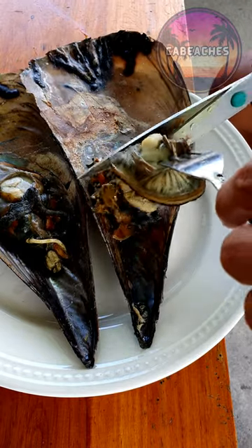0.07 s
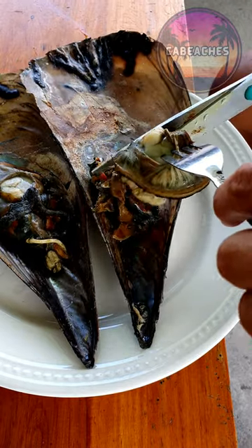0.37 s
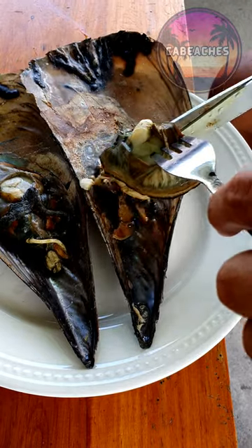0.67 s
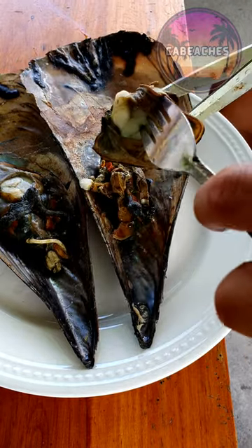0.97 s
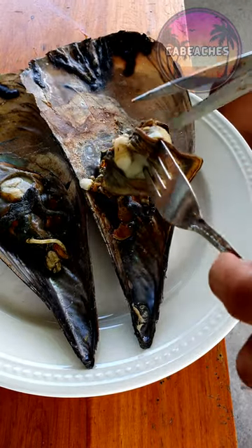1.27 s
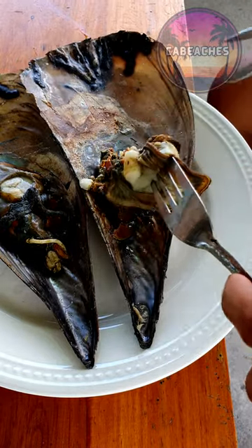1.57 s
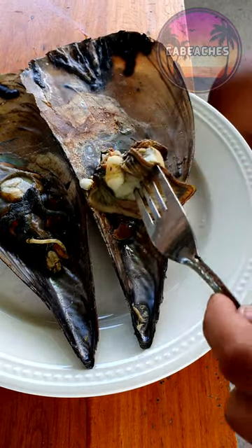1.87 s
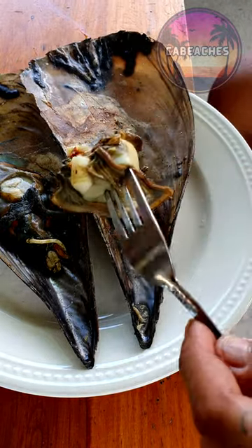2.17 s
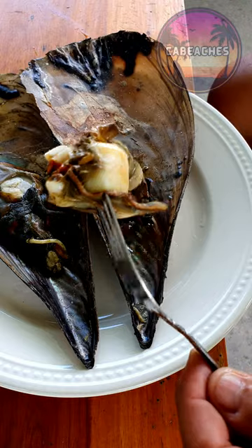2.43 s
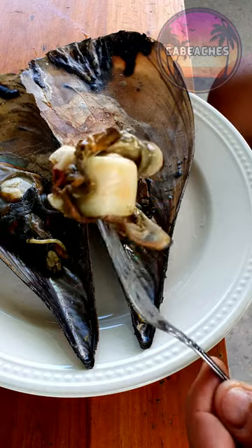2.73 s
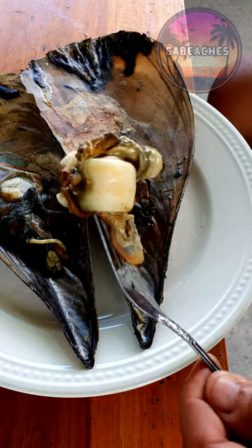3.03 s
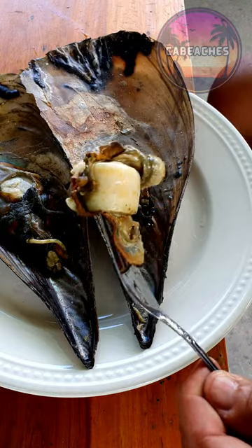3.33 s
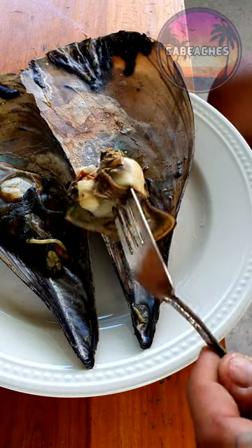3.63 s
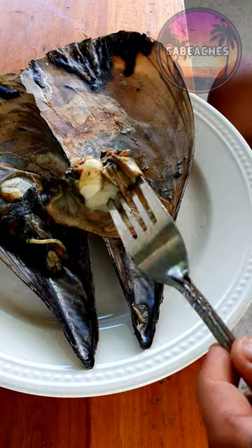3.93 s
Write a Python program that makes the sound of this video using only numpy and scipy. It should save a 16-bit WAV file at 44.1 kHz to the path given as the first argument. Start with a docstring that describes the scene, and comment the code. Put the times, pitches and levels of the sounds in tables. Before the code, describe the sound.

Cutlery clicks against a shell on a china plate outdoors, over a faint bird and insect.

```python
"""Shellfish on a porch

Close to the microphone, a knife and fork lift shellfish from its shell on a china plate: one rattling
knock on the plate, one sharp click of steel, brittle ticks, faint rubs, wet smacks and thin squeaks.
Out in the garden an insect buzzes and a far bird repeats a falling call, over a low rumble,
a distant rush and a hum that comes and goes."""
import sys
import numpy as np
from scipy import signal
from scipy.fft import rfft, irfft, next_fast_len
from scipy.io import wavfile
from scipy.ndimage import map_coordinates

SR = 44100
rng = np.random.default_rng(int(sys.argv[2]) if len(sys.argv) > 2 else 0)


def master_out(mix):
    """Clip the mix to full scale and print it as 16-bit PCM to the path in sys.argv[1]."""
    frames = np.transpose(np.atleast_2d(mix))
    ceiling = np.clip(frames, -1, 1)
    pcm = np.round(ceiling * 32767).astype(np.int16)
    wavfile.write(sys.argv[1], SR, pcm)


N = 176400

# Where the garden sits at the microphone. Each row: frequency in Hz, left over right in dB.
GARDEN_LEAN = [(60, -1), (120, -2.5), (380, -3), (1300, -4), (2400, -7), (4400, -4.5), (8200, -9),
               (15000, 1.5)]
# The porch's reverberation. Each row: frequency in Hz, seconds to fall 60 dB.
PORCH_DECAY = [(300, 0.14), (2500, 0.35), (6000, 0.32), (9000, 0.18), (15000, 0.22)]


def amp(db):
    """Decibels to gain."""
    return 10 ** (np.asarray(db) / 20)


def unit(x):
    """Scale to rms 1."""
    return x / np.sqrt(np.mean(x ** 2) + 1e-20)


def along(points, hz):
    """Read (Hz, value) points on a log frequency axis."""
    f, v = np.transpose(points)
    return np.interp(np.log(hz + 1), np.log(f + 1), v)


def curve(rows):
    """Join (seconds, value) points, one value per sample."""
    return np.interp(np.arange(N) / SR, *np.transpose(rows))


def wobble(rate, size=N):
    """A smooth random curve, rate knots a second."""
    return map_coordinates(rng.standard_normal(512), [np.arange(size) * rate / SR], mode="wrap")


def pan(db):
    """Two gains that put left db above right."""
    return amp(np.array([[db], [-db]]) / 2)


def add(track, start, x):
    """Mix x into the track at start seconds."""
    i = max(0, round(start * SR))
    track[..., i:i + x.shape[-1]] += x[..., :max(0, N - i)]


def filtered(x, response):
    """Filter x by a gain given as a function of Hz."""
    size = next_fast_len(N + SR // 2)
    return irfft(rfft(x, size) * response(np.fft.rfftfreq(size, 1 / SR)), size)[..., :N]


def coloured(x, points, size=2048):
    """A minimum-phase filter through (Hz, dB) points that keeps the energy of a white burst."""
    cepstrum = irfft(np.log(amp(along(points, np.fft.rfftfreq(size, 1 / SR)))))
    cepstrum[1:size // 2] *= 2
    cepstrum[size // 2 + 1:] = 0
    impulse = irfft(np.exp(rfft(cepstrum)))
    return signal.fftconvolve(x, impulse[None] / np.linalg.norm(impulse), axes=1)[:, :x.shape[1]]


def leaning(x, lean):
    """Pan each frequency by (Hz, left over right in dB) points."""
    return filtered(x, lambda hz: amp(np.array([along(lean, hz), -along(lean, hz)]) / 2))


def lagging(x, lag_s=0.00035):
    """Low sound reaches the microphone's left side a little after its right."""
    return filtered(x, lambda hz: np.exp(np.pi * 1j * hz * lag_s * np.array([[-1], [1]])))


def noise(spectrum):
    """Stereo outdoor noise of rms 1, shaped by (Hz, dB) points."""
    # How alike the two channels are. Each row: frequency in Hz, correlation.
    likeness = [(60, 0.97), (130, 0.99), (290, 0.9), (640, 0.49), (1400, -0.45), (3100, 0.2), (7000, 0.1),
                (15000, -0.0023)]

    def mid_side_gains(hz):
        angle = np.arccos(np.clip(along(likeness, hz), -1, 1)) / 2
        return amp(along(spectrum, hz)) * [np.cos(angle), np.sin(angle)]

    mid, side = filtered(rng.standard_normal((2, N)), mid_side_gains)
    return unit(leaning(np.array([mid + side, mid - side]), GARDEN_LEAN))


def echoes(x, decay, rise_s):
    """The diffuse reverberation of x, each frequency dying at its own speed."""
    hz, t, spectra = signal.stft(rng.standard_normal((2, SR // 2)), SR, nperseg=256)
    envelope = amp(-60 * t / along(decay, hz)[:, None]) * (1 - np.exp(-t / rise_s))
    tail = signal.istft(spectra * envelope, SR, nperseg=256)[1]
    return signal.fftconvolve(x, tail / np.linalg.norm(tail[0]), axes=1)[:, :N]


def crack(colour, t60):
    """The brief stereo noise burst of a contact."""
    t = np.arange(SR // 3) / SR
    fade = amp(-60 * t / t60)
    burst = rng.standard_normal((2, len(t))) * fade
    return coloured(burst * np.linalg.norm(fade) / np.linalg.norm(burst, axis=1, keepdims=True), colour)


def ring(modes):
    """Damped modes, a little different at each blow and in each channel."""
    t = np.arange(SR // 3) / SR
    x = np.zeros((2, len(t)))
    for hz, db, t60 in modes:
        fade = amp(db + rng.normal(0, 1.2) - 60 * t / t60)
        x += fade * np.sin(2 * np.pi * hz * t + rng.normal(0, 0.65, (2, 1)))
    return x


def glide(length, first_hz, middle_hz, last_hz, level_db, rough, flutter_db):
    """A whistle that bends through three pitches."""
    u = np.linspace(0, 1, int(length * SR))
    bend = np.polyval(np.polyfit([0, .5, 1], [first_hz, middle_hz, last_hz], 2), u)
    hz = bend * (1 + rough * wobble(900, len(u)))
    arch = 2 * np.sqrt(np.abs(np.sin(np.pi * u)))
    gain = amp(level_db + flutter_db * wobble(250, len(u)))
    return gain * arch * np.sin(2 * np.pi * np.cumsum(hz) / SR)


def background():
    """Low rumble, a dull rush, a swell like a far vehicle coming nearer, and faint hiss."""
    # The four spectra. Each row: frequency in Hz, relative level in dB.
    rumble_colour = [(20, -29), (35, -11.5), (50, -13.5), (62, -2.5), (80, 3.5), (100, -4.5), (130, -15),
                     (160, -10.5), (200, -15.5), (300, -21), (450, -34), (900, -44), (2500, -110)]
    rush_colour = [(100, -0.5), (300, 0.5), (500, -0.5), (900, -9.5), (1450, -6.5), (2000, -18),
                   (2600, -25), (5000, -34.5), (8000, -64), (16000, -63)]
    swell_colour = [(400, -19.5), (700, -4.5), (950, 1.5), (1350, -4), (1900, -16), (2600, -29.5),
                    (5000, -51), (10000, -73)]
    hiss_colour = [(1000, -11), (3500, 1), (5000, -6.5), (7500, -2.5), (10000, -29), (11000, -5.5),
                   (13000, -7), (15000, -9), (15800, -35)]
    # How the first three rise and fall. Each row: time in seconds, relative level in dB.
    rumble_level = [(0.0, -48.5), (0.72, -44), (0.8, -47.5), (0.9, -45), (1.93, -51.5), (2.02, -41.5),
                    (2.07, -64), (2.1, -44), (2.82, -45), (2.85, -49), (3.04, -42.5), (3.36, -47),
                    (3.5, -42), (4.0, -44.5)]
    rush_level = [(0.0, -59), (0.34, -58.5), (2.09, -60.5), (2.66, -57.5), (2.97, -60.5), (3.55, -57.5),
                  (4.0, -58)]
    swell_level = [(0, -64.5), (1.9, -70), (2.35, -57.5), (2.7, -65), (3.2, -59.5), (3.55, -58.5),
                   (3.8, -54.5), (4, -55.5)]
    rumble = amp(curve(rumble_level) + 1 + 0.63 * wobble(14)) * noise(rumble_colour)
    rush = amp(curve(rush_level) + 2 + 0.48 * wobble(5.71)) * noise(rush_colour)
    swell = amp(curve(swell_level) + 0.27 * wobble(25)) * noise(swell_colour)
    return lagging(rumble) + rush + swell + amp(-79) * noise(hiss_colour)


def hums():
    """Low machine-like hums start and stop, wavering slightly."""
    # Each row: start and end in seconds, pitch in Hz, relative level in dB.
    tones = [(-.05, 1.17, 120.3, -43.5), (2.39, 3.66, 120.3, -44.8), (1.2, 2.35, 112.3, -56),
             (-.1, .85, 202, -60), (2.3, 2.95, 202, -61), (-.1, 2.2, 266, -66), (2.3, 3.8, 265, -62)]
    t, x = np.arange(N) / SR, np.zeros(N)
    for start, end, hz, db in tones:
        gate = np.clip(np.minimum(t - start, end - t) / 0.11 + .5, 0, 1)
        gain = np.sqrt(2) * amp(db - .5 + 2.1 * wobble(8.3))
        phase = 2 * np.pi * np.cumsum(hz * (1 + 0.0077 * wobble(8))) / SR
        x += gain * gate * np.sin(phase)
    return lagging(x * pan(db=-0.4))


def insect():
    """In the garden, fast pulses ring a narrow high resonance; more insects hiss further off."""
    # The resonance. Each row: frequency in Hz, relative level in dB.
    band = [(6500, -33.5), (7850, -24.5), (8170, -5.5), (8420, 1), (8680, -2), (9000, -9.5), (9900, -15.5),
            (10400, -26.5), (12000, -48)]
    # The insects' effort. Each row: time in seconds, gain in dB.
    effort = [(0, -3), (.95, 3.5), (1.3, -2), (3.3, 1), (3.7, 2.5), (4, 2)]
    pulse_hz, scatter_s = 215.5, .000015
    sag = 0.0037  # share of the pitch lost per second
    t, pulses = np.arange(N) / SR, np.zeros((2, N))
    cycles = np.cumsum(pulse_hz * (1 + 0.0032 * wobble(12))) / SR
    times = np.interp(np.arange(1, cycles[-1] - 1), cycles, t)
    for channel in pulses:
        at = np.round((times + rng.normal(0, scatter_s, len(times))) * SR).astype(int)
        channel[at] = amp(rng.normal(0, 0.67, len(times)))
    buzz = amp(-72) * unit(leaning(coloured(pulses, band), GARDEN_LEAN))
    chorus = amp(-68.5) * noise(band)
    slowing = SR * (t + sag * t * (t[-1] - t) / 2)
    sagging = np.array([map_coordinates(channel, [slowing]) for channel in buzz + chorus])
    return amp(curve(effort) + 0.53 * wobble(8.23)) * sagging


def bird():
    """Far off, a thin note falls into a rasping low one; no two calls are alike, and trees blur them."""
    # Each row: start in seconds, relative level in dB, shifts of the high and low notes in Hz,
    # time stretch, rasp gain in dB.
    calls = [(.235, -59, 97, -120, .92, -4), (0.834, -55.5, -61, 283, 1.004, -8),
             (1.412, -58.5, -61, 118, 1.03, -3), (2.126, -61, -150, -46, 0.91, -7.5),
             (2.64, -58, 60, 31, .93, -5.5), (3.385, -62, -150, -100, 0.91, -6),
             (3.765, -60, 0.5, -59, 0.96, -2.5)]
    # The course of a call. Each row: time in seconds, pitch in Hz, relative levels in dB of the voice,
    # a part in unison with it, the octave and the rasp, then roughness as a share of the pitch.
    slur = [(0, 5650, -32, -36, -60, -40, .008), (.045, 5550, -21, -24, -55, -22, .014),
            (.115, 4950, -17, -19, -50, -13, .035), (.138, 4300, -25, -24, -40, -14, .05),
            (.155, 3560, -4, -21, -16, -5, .04), (.185, 3280, -1.5, -19, -17, -4.5, .05),
            (.21, 3030, -4.5, -26, -22, -7, .055), (.235, 2850, -26, -45, -40, -22, .05)]
    # The hoarse part's spectrum. Each row: frequency in Hz, relative level in dB.
    rasp_colour = [(1500, -37), (2500, -6), (3200, 4.5), (4300, -5.5), (5200, -1.5), (6400, 0.5),
                   (7200, -16.5), (8500, -14), (12000, -38)]
    # Fainter notes. Each row: start and length in seconds, first, middle and last Hz, relative dB.
    peeps = [(1.226, 0.12, 3460, 3426, 3490, -81), (3.149, 0.039, 4050, 3950, 3780, -74),
             (3.203, 0.097, 3750, 3470, 3140, -78.5)]
    # Reverberation among the trees. Each row: frequency in Hz, seconds to fall 60 dB.
    tree_decay = [(2000, 0.37), (8000, 0.53)]
    x = np.zeros((2, N))
    at, *columns = np.transpose(slur)
    for start, db, high_hz, low_hz, stretch, rasp_db in calls:
        size = int(at[-1] * stretch * SR)
        t = np.arange(size) / SR
        course = [np.interp(t / stretch, at, column) for column in columns]
        fall, voice_db, unison_db, octave_db, hoarse_db, rough = course
        hz = fall + np.interp(fall, [fall.min(), fall.max()], [low_hz, high_hz])
        waver = 1 + rough * wobble(900, size) + .016 * wobble(70, size)
        phase = 2 * np.pi * np.cumsum(hz * waver) / SR
        voice = (amp(voice_db) + amp(unison_db)) * np.sin(phase) + amp(octave_db) * np.sin(2 * phase)
        rasp = amp(rasp_db + hoarse_db) * coloured(rng.standard_normal((2, size)), rasp_colour)
        add(x, start, amp(db + 3.4 * wobble(68.9, size)) * (voice + rasp))
    for start, *shape in peeps:
        add(x, start, glide(*shape, rough=.012, flutter_db=2))
    size = int(0.088 * SR)  # a fading hiss opens one of the faint notes
    hiss = np.linspace(1, 0, size) * coloured(rng.standard_normal((2, size)), rasp_colour)
    add(x, 3.155, amp(-71) * hiss)
    return (amp(-4) * x + echoes(x, tree_decay, rise_s=0.0029)) * pan(db=-9)


def squeaks():
    """A short run of very high, ragged squeaks on the porch."""
    # Each row: start and length in seconds, first, middle and last pitch in Hz, relative level in dB.
    glides = [(1.43, 0.053, 11000, 11800, 12000, -75), (1.477, 0.067, 11900, 13200, 12700, -76),
              (1.48, 0.078, 10900, 12500, 12100, -70), (1.53, 0.038, 12600, 12350, 11860, -66),
              (1.578, 0.029, 12000, 11850, 11900, -67), (1.64, 0.035, 11400, 12600, 12200, -75),
              (1.665, 0.039, 12000, 11800, 11700, -69), (1.66, .09, 15200, 14600, 14100, -85),
              (1.73, .028, 11600, 12150, 11800, -73), (1.795, 0.13, 14000, 12500, 11600, -78),
              (1.63, 0.051, 9900, 10640, 10100, -75), (1.73, 0.14, 10700, 9900, 9400, -80)]
    x = np.zeros((2, N))
    for start, *shape in glides:
        add(x, start, glide(*shape, rough=.007, flutter_db=3.5))
    return (amp(-2) * x + amp(-4) * echoes(x, PORCH_DECAY, rise_s=0.0042)) * pan(db=-6)


def meat():
    """Wet meat smacks softly as it comes away, well to the right."""
    # Each row: start in seconds, relative level in dB, spectral peak in Hz.
    smacks = [(0.144, -59, 3180), (3.492, -49, 4800)]
    x = np.zeros((2, N))
    for start, db, hz in smacks:
        colour = [(hz / 2, -20), (hz * 0.89, -5), (hz, 0),
                  (hz * 1.28, -6), (hz * 1.4, -28), (hz * 3.3, -55)]
        add(x, start, amp(db) * crack(colour, t60=.014))
    return (x + amp(-6) * echoes(x, PORCH_DECAY, rise_s=0.0081)) * pan(db=-12)


def rubs():
    """Faint grainy strokes of steel over the shell, close and dry."""
    # Each row: start and length in seconds, relative level in dB, peak in Hz, left over right in dB.
    strokes = [(0, 0.041, -64, 3470, -9), (0.026, 0.074, -59, 3400, -7), (0.181, 0.091, -64, 3420, -5),
               (0.278, .09, -60, 10900, 0), (0.526, 0.016, -44, 10100, -4), (0.97, 0.072, -72.5, 11100, -6),
               (1.442, .18, -68, 11500, -1), (1.586, 0.26, -71, 11200, -3), (3.377, 0.18, -74.5, 5360, -8),
               (3.495, .17, -76, 4430, -7)]
    # A stroke's spectrum. Each row: multiple of its peak frequency, relative level in dB.
    band = [(.17, -55), (.6, -30), (.82, -6), (1, 0), (1.13, -4), (1.22, -25), (1.4, -55)]
    x = np.zeros((2, N))
    for start, length, db, hz, lean_db in strokes:
        size = int(length * SR)
        grains = rng.standard_normal((2, size)) * amp(3.3 * wobble(482, size)) * np.hanning(size)
        colour = [(hz * ratio, level) for ratio, level in band]
        add(x, start, amp(db) * coloured(grains, colour) * pan(lean_db))
    return x


def ticks():
    """Tines catch on the brittle shell in short clusters."""
    # Each row: start in seconds, relative level in dB, left over right in dB.
    catches = [(0.6937, -40.5, -3), (0.7009, -42, -2), (.709, -49, 3), (0.7158, -44.5, -6),
               (0.817, -42.5, 8), (0.8228, -40.5, -5), (0.827, -43, 0), (0.832, -40, -5),
               (0.846, -44.5, -2), (1.982, -52.5, -7), (1.9921, -51.5, -10.5), (2.004, -58, -4),
               (3.363, -58, -11), (3.3708, -54, -10), (3.376, -51.5, -9.5), (3.391, -55, -8)]
    # A tick's spectrum. Each row: frequency in Hz, relative level in dB.
    colour = [(700, -9), (2000, -12), (4000, -13), (7300, -12), (8500, -1), (9400, 3), (11500, -6),
              (14000, -9), (16000, -24)]
    x = np.zeros((2, N))
    for start, db, lean_db in catches:
        add(x, start, amp(db) * crack(colour, t60=0.018) * pan(lean_db))
    return x + amp(-1) * echoes(x, PORCH_DECAY, rise_s=0.001) * pan(db=-1.5)


def plate():
    """The shell is pressed down and rattles on the china plate, which rings briefly."""
    # Each row: start in seconds, relative level in dB.
    knocks = [(0.0746, -32), (.0815, -36), (.0895, -40.5)]
    # The plate's modes. Each row: frequency in Hz, relative level in dB, seconds to fall 60 dB.
    china_modes = [(613, -14, 0.13), (791, -2, 0.12), (1305, -9, 0.091), (1910, -19, 0.047),
                   (2006, -16, 0.07), (2257, -5.5, 0.042), (2592, -7, 0.056), (2745, -17, 0.077)]
    # The contact's spectrum. Each row: frequency in Hz, relative level in dB.
    colour = [(300, -21), (550, -11), (800, 5), (1600, -5.5), (2700, 3), (4500, -10.5), (9500, -14),
              (12500, -23), (15000, -53)]
    x = np.zeros((2, N))
    for start, db in knocks:
        add(x, start, amp(db) * (amp(-5) * ring(china_modes) + amp(-3) * crack(colour, t60=0.037)))
    return x * pan(db=-4.5) + amp(-9.5) * echoes(x, PORCH_DECAY, rise_s=0.0035) * pan(db=-3)


def cutlery():
    """The knife slips off the shell's edge: a sharp click, a short ring of steel, the porch's answer."""
    # Each row: start in seconds, relative level in dB.
    clicks = [(.541, -19), (.5445, -35)]
    # The cutlery's modes. Each row: frequency in Hz, relative level in dB, seconds to fall 60 dB.
    steel_modes = [(1922, -8, .2), (2165, -8, .2), (2250, -8, .18), (2705, 0, .18), (3316, -7, .16),
                   (3550, -7, .2), (3818, -2, .15), (5685, -5, .17), (6627, -11, .15), (7483, -5, .08),
                   (8156, -4, .1), (8748, -4, .1)]
    # The click towards the microphone and into the porch. Each row: frequency in Hz, relative dB.
    direct_colour = [(300, -8), (1300, -10), (2550, 2.5), (3150, 1), (3800, 9.5), (4500, -4), (5500, -8),
                     (7700, 1), (10000, -2.5), (13500, -5), (16000, -14)]
    spread_colour = [(400, -27), (1400, -11), (2300, 3), (3000, -4), (3800, -3), (4600, -5.5), (7000, -0.5),
                     (9000, -1), (12000, -6), (16000, -23)]
    # Where the click sits. Each row: frequency in Hz, left over right in dB.
    lean = [(1000, -1), (2700, -5), (5000, -12.5), (9000, -8.5), (12500, 1), (16000, 3)]
    wall_s, wall_db = .0118, -21  # a near wall throws the click back
    x, spread = np.zeros((2, N)), np.zeros((2, N))
    for start, db in clicks:
        add(x, start, amp(db) * (amp(-29) * ring(steel_modes) + crack(direct_colour, t60=0.0083)))
        add(spread, start, amp(db) * crack(spread_colour, t60=0.008))
        add(spread, start + wall_s, amp(db + wall_db) * crack(spread_colour, t60=0.02))
        add(x, start + wall_s, amp(db + wall_db) * crack(spread_colour, t60=0.032))
    return leaning(x, lean) + amp(-9) * echoes(spread, PORCH_DECAY, rise_s=0.0016) * pan(db=-4.5)


def scene():
    """The meal close to the microphone, the garden around."""
    meal = plate() + cutlery() + ticks() + rubs() + meat() + squeaks()
    return meal + bird() + insect() + hums() + background()


def record(dry):
    """The recorder keeps nothing above its band limit."""
    return filtered(dry, lambda hz: hz < 15650)


dry = scene()
out = record(dry)
master_out(out)
```